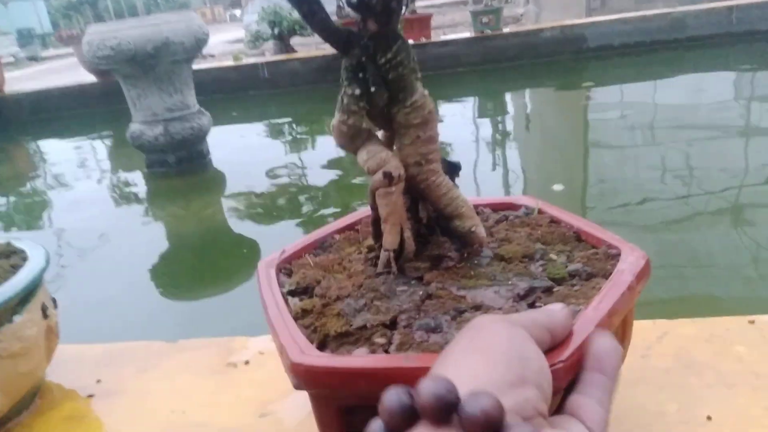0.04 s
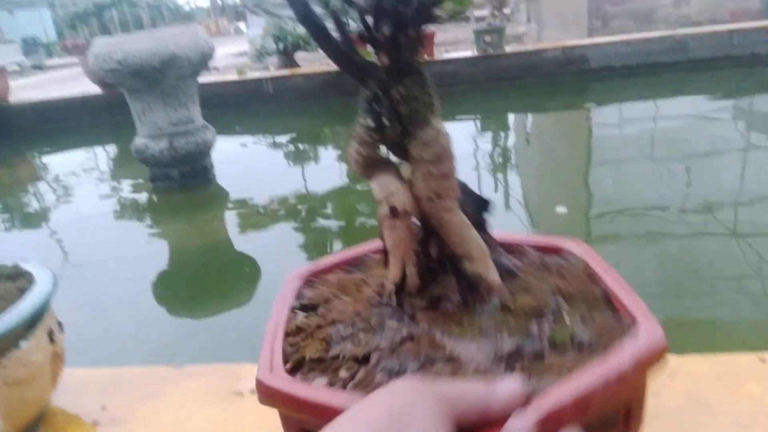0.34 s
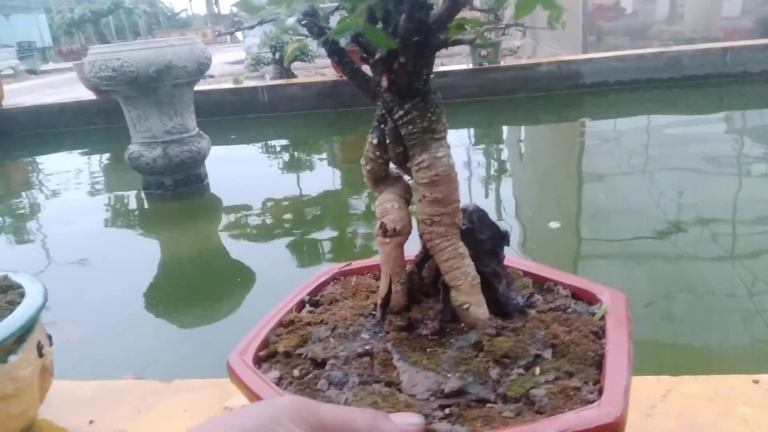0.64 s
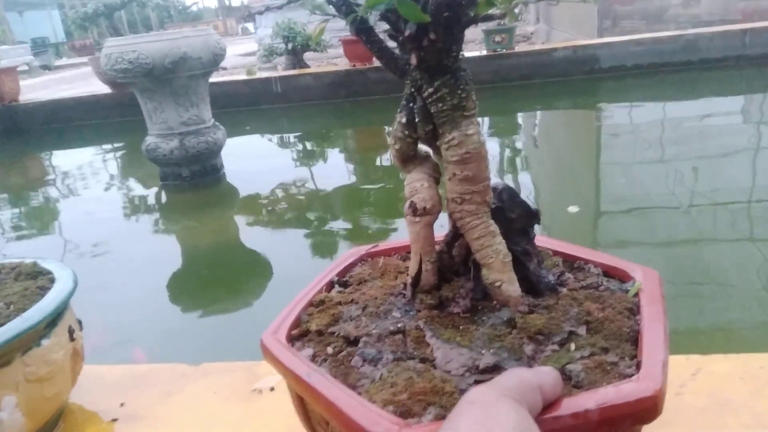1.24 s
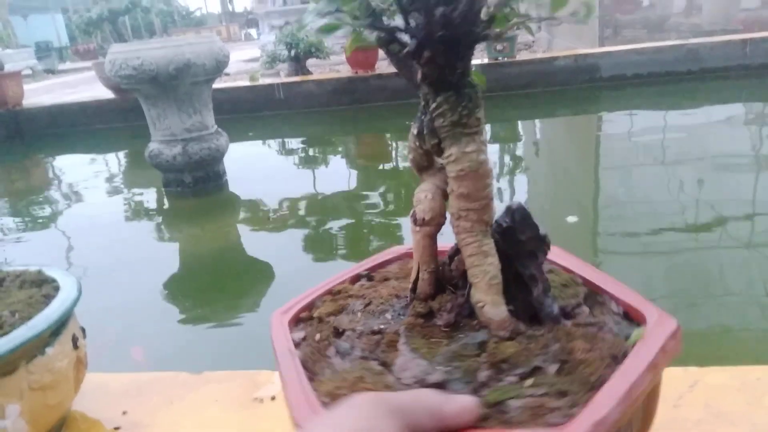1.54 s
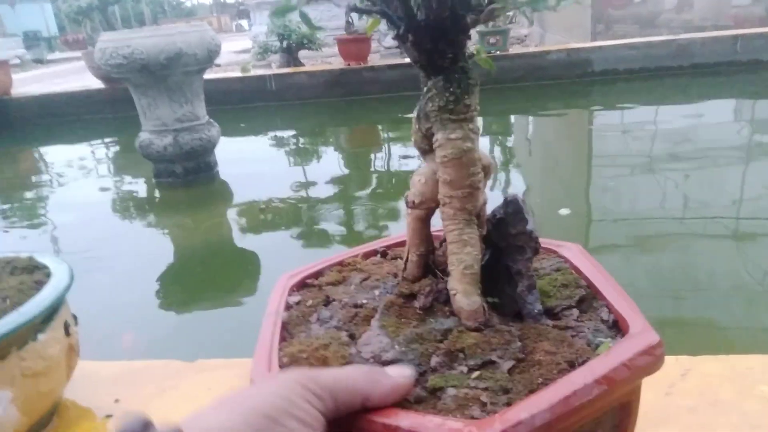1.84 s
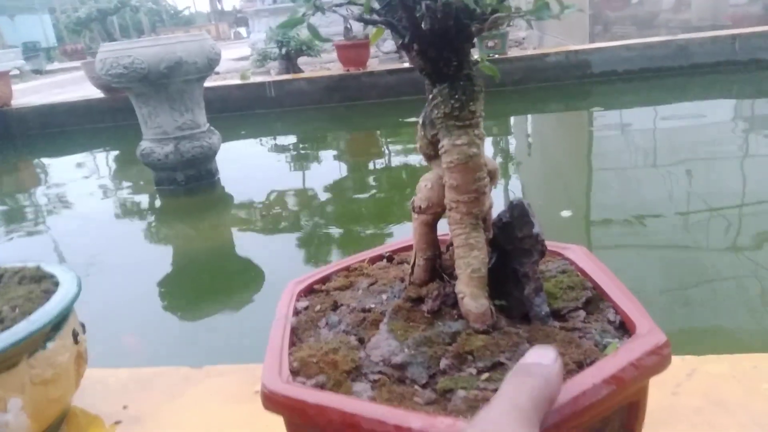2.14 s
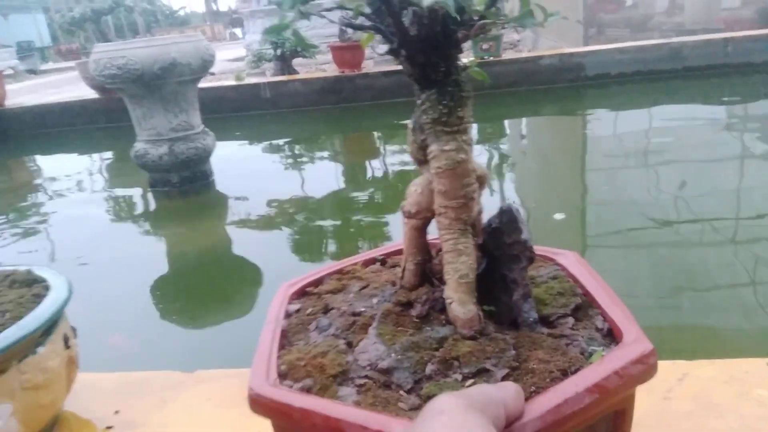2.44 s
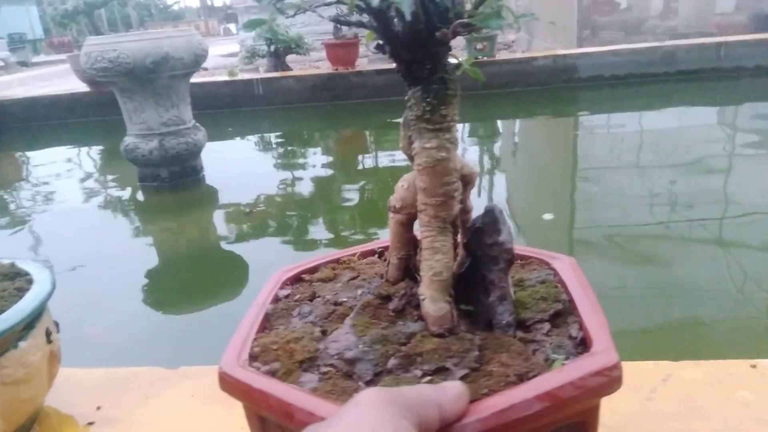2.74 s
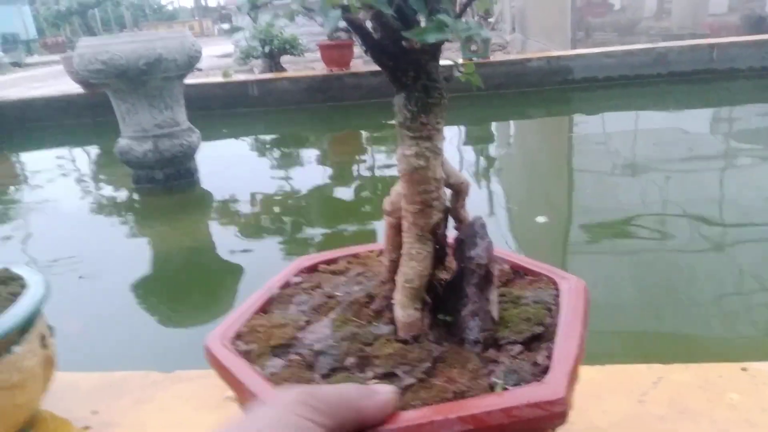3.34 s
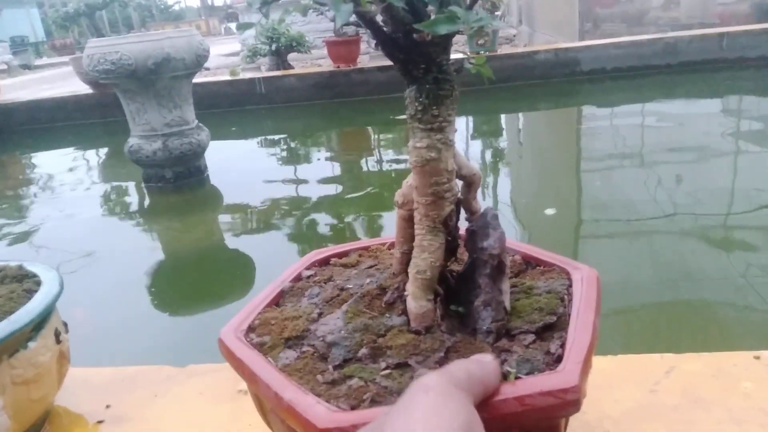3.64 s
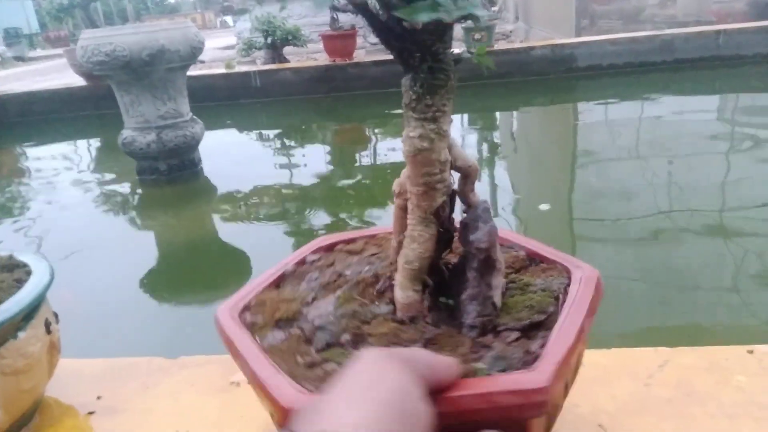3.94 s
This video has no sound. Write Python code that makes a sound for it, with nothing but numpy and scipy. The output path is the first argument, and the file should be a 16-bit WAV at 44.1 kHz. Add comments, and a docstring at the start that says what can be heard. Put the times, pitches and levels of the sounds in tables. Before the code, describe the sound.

A ceramic pot scrapes on gritty concrete from 0.2 to 0.8 seconds, juddering, with dull knocks, tiny squeaks and a slight ring. A second scrape runs from about 1.5 to 1.9 seconds. Two shorter pushes, joined by a light slide, follow between 2.6 and 3.3 seconds. Grit cracks near 3.85 seconds before a last brief slide. A steady low outdoor rumble lies underneath.

```python
"""A glazed ceramic planter full of soil is turned by hand on a gritty concrete ledge by a pond.
Over a steady outdoor rumble, the first push starts at 0.2 s: sand hisses under the foot, coarser grit
rings the wall, and the pot judders, knocks and squeaks as it catches. A second push follows at 1.45 s.
The hand rubs softly as it takes a new grip, then gives two shorter pushes between 2.6 and 3.3 s.
Two faint chirps sound far off, and near 3.85 s grit cracks under the foot before one last light slide."""
import sys
import numpy as np
from scipy import signal
from scipy.fft import rfft, irfft, next_fast_len
from scipy.io import wavfile
from scipy.ndimage import map_coordinates

SR = 44100
rng = np.random.default_rng(int(sys.argv[2]) if len(sys.argv) > 2 else 0)


def bounce(signal):
    """Save signal as a 16-bit WAV file at the path given by the first command-line argument."""
    frames = np.transpose(np.atleast_2d(signal))
    limited = np.clip(frames, -1, 1)
    pcm = np.round(limited * 32767).astype(np.int16)
    wavfile.write(sys.argv[1], SR, pcm)


N = 176400  # 4 seconds

# Levels in the tables are starting values; the functions add their own gains.
# how hard the pot scrapes, one list for each push: time_s, hiss_db, grind_db, judder_db
PUSHES = [
    [(0.198, -83, -80, -79), (0.232, -66, -66, -54), (0.314, -60, -54.5, -46.5), (0.434, -60, -54.5, -43.5),
     (0.458, -50, -41.5, -39.5), (0.496, -62.5, -61, -45), (0.588, -57.5, -52, -43.5),
     (0.598, -59, -56, -44.5), (0.704, -63, -56, -48), (0.71, -56.5, -52, -48), (0.774, -67, -66.5, -62.5),
     (0.786, -105, -92, -75)],
    [(1.45, -88, -78, -67), (1.47, -77, -65, -41.5), (1.486, -66.5, -59.5, -47.5),
     (1.646, -59.5, -53, -44.5), (1.66, -54, -46, -37.5), (1.672, -58, -50, -40),
     (1.69, -55.5, -49.5, -39.5), (1.772, -64.5, -60.5, -50), (1.796, -60.5, -54.5, -52),
     (1.818, -62.5, -55, -42), (1.868, -66, -65.5, -66), (1.884, -93, -91, -57)],
    [(2.568, -93, -83, -51), (2.582, -77, -73, -67), (2.612, -67.5, -62, -45.5), (2.628, -66, -61, -61),
     (2.642, -64.5, -58.5, -46.5), (2.664, -62, -59, -48), (2.684, -69, -64, -55), (2.696, -69, -65, -52),
     (2.702, -58, -59, -49), (2.756, -68.5, -64, -58.5), (2.764, -84, -82, -54), (2.775, -74, -79, -59)],
    [(2.968, -83, -95, -55), (2.988, -71, -69, -54), (3.022, -70.5, -70.5, -60), (3.06, -62, -57.5, -48),
     (3.07, -65, -58, -53.5), (3.168, -58.5, -57.5, -45), (3.19, -61.5, -62, -54),
     (3.23, -60.5, -57.5, -43.5), (3.24, -63, -60, -54), (3.264, -61.5, -60, -52), (3.294, -63.5, -74, -65),
     (3.304, -89, -93, -80)],
]
# light slides between and after the pushes: time_s, hiss_db, grind_db, judder_db
SLIDES = [
    [(2.785,-82,-79,-72), (2.808,-62.5,-64.5,-55.5), (2.88,-63.5,-73,-66), (2.95,-63.5,-65,-56),
     (2.962,-85,-101,-80)],
    [(3.933,-92,-89,-57), (3.947,-69,-65,-57.5), (3.984,-68.5,-59.5,-52.5), (4.0,-61,-72,-54)],
]
# the pot creeps while the grip changes: start_s, length_s, hiss_db, grind_db
CREEPS = [(1.209, 0.033, -71, -78), (1.324, 0.03, -78.5, -77), (1.995, 0.019, -75.5, -81),
          (2.446, 0.024, -76.5, -72.5), (3.834, 0.057, -67, -67.5)]
# the tone of one sand grain at the two microphones: frequency_hz, left_db, right_db
SAND_TONE = [(497, -2, -16), (1460, -2, -3.5), (2420, -3.5, -3.5), (3030, -5.5, 2), (3940, -12, -1),
             (4620, -17.5, 4.5), (6060, -18.5, -6.5), (6940, -25, -4.5), (8000, -31, -6.5),
             (10700, -36, -7), (12700, -35, -19), (15500, -33, -28)]
# the tone of one coarser grain: frequency_hz, left_db, right_db
GRIT_TONE = [(298, -32, -8.5), (893, -7.5, -18), (1047, -3, -4), (1300, -3, -18), (1640, -5.5, -14),
             (2160, 3, -6), (2690, -13.5, -11.5), (3100, -19, -10), (4200, -24, -27.5), (6200, -33, -24),
             (7500, -41, -31.5), (15500, -41, -47)]
# the notes of the pot's wall: pitch_hz, level_db, ring_s (time to fade by 60 dB), left_minus_right_db
WALL_NOTES = [(1008, -10, 0.11, -5), (1070, -16, 0.054, 0), (1469, -17.5, 0.11, 0), (1813, -6.5, .045, 10),
              (1924, -2.5, 0.067, 8), (2094, -7, 0.089, 11), (2171, 2.5, 0.065, 1.5), (2244, 1, 0.16, 3),
              (2450, -5.5, 0.088, 6.5), (2730, -16.5, 0.15, -8), (3280, -11, 0.14, 3),
              (4050, -12.5, 0.015, -15)]
# how firmly the foot's point of contact drives the wall as the pot turns: time_s, level_db
WALL_DRIVE = [(.24, 6), (.35, 0), (.5, 0), (.62, -5.5), (1.48, 2), (1.7, -2.5), (1.85, -5), (2.65, 0),
              (2.85, -2), (3.15, -6.5), (3.96, -1)]
# the tone of one bump of the heavy pot on the ledge: frequency_hz, level_db
BUMP_TONE = [(30, -29), (90, 3.5), (160, 6.5), (230, 2.5), (320, 1.5), (380, -1), (500, -0.5), (720, -4.5),
             (900, -21), (1400, -29), (4000, -95)]
# the foot drops on the ledge: start_s, level_db, cutoff_hz (treble above this is softened)
KNOCKS = [(.454, -20.5, 1650), (0.575, -30, 654), (.586, -30.5, 443), (1.401, -47, 800), (1.47, -39, 600),
          (1.657, -30, 1310), (1.731, -28.5, 700), (2.192, -33, 416), (2.640, -33, 690),
          (2.647, -37.5, 550), (2.656, -33.5, 595), (3.228, -36.5, 700)]
# the tone of a knock before it is softened: frequency_hz, level_db
KNOCK_TONE = [(40, -11.5), (130, 5), (280, 5), (480, -2.5), (750, -9), (1000, -23), (2000, -56),
              (6000, -55)]
# the foot sticks and squeaks: start_s, length_s, pitch_hz, level_db
SQUEAKS = [(0.504, 0.0086, 2076, -44.5), (.591, 0.0095, 1436, -45.5), (.592, 0.0072, 1880, -44),
           (0.637, 0.0043, 1890, -36), (0.644, 0.0147, 1930, -47), (0.667, 0.01, 1355, -51.5),
           (0.7094, 0.0059, 2090, -43.5), (0.726, 0.0099, 1484, -51.5), (1.842, 0.013, 1850, -52)]
# large grains crack under the foot, singly or in quick runs: start_s, level_db
CRACKS = [(.4555, -40), (.462, -40), (.468, -38.5), (1.659, -47), (1.694, -44), (2.703, -48), (3.138, -50),
          (3.8419, -59), (3.847, -52), (3.8542, -49.5), (3.857, -42), (3.861, -38), (3.866, -41.5)]
# the tone of a crack: frequency_hz, left_db, right_db
CRACK_TONE = [(597, -8, -27), (1450, 10, -10), (2620, 7, 5), (4270, -13, -1), (6440, -26, -0.5),
              (8440, -35, -6), (9800, -25, 2), (12700, -25, -9), (15500, -28, -23)]
# the ceramic notes that a crack sets ringing: pitch_hz, level_db, ring_s
CRACK_NOTES = [(527, -3.5, 0.03), (700, -9.5, 0.042), (1380, -9.5, 0.024), (2137, -2.5, 0.024),
               (2500, -5.5, 0.014), (3500, -17.5, 0.023), (4125, -7.5, 0.03), (4350, -13, 0.026),
               (4470, -15.5, 0.022)]
# thin, high ringing of the wall: start_s, length_s, pitch_hz, level_db
WALL_SINGING = [(.27, 0.18, 5380, -75), (0.233, .2, 5930, -72), (0.264, .16, 6700, -75),
                (0.245, .15, 7400, -78), (.53, .11, 6210, -73), (3.07, .2, 2970, -71)]
# the hand takes a new grip: start_s, length_s, pitch_hz, width_hz, level_db
HAND_RUB = (2.41, .2, 570, 280, -65)
# the tone of the outdoor rumble: frequency_hz, level_db
RUMBLE_TONE = [(11, -31.5), (18, -4), (48, -1.5), (95, -8.5), (130, -7.5), (264, -22.5), (351, -25),
               (415, -31), (536, -31), (731, -38), (1320, -52), (4860, -70), (15500, -81)]
# how alike the rumble is on left and right: frequency_hz, likeness (0 unrelated, 1 the same)
RUMBLE_LIKENESS = [(30, 0.82), (170, 0.98), (300, 0.72), (520, 0.48), (1000, 0), (8000, 0)]
# the tone of the thin background hiss: frequency_hz, level_db
HIGH_HISS_TONE = [(2500, -16), (4000, -8.5), (4500, 6), (5050, 1.5), (5450, -15), (6500, -6.5),
                  (7200, -1.5), (8300, -0.5), (8900, -12), (10500, -5.5), (13000, -17)]
# faint rising chirps far off, perhaps a bird: start_s, length_s, level_db
CHIRPS = [(3.358, .07, -83), (3.412, 0.059, -83)]

SAND_PER_S, GRIT_PER_S, BUMPS_PER_S, SNAPS_PER_S = 6500, 2000, 420, 170  # tiny impacts each second
SAND_DB, GRIT_DB, RING_DB, JUDDER_DB = 2.5, 1.5, -2.5, 2.5
SAND_SNAP_DB, GRIT_SNAP_DB = -11.5, -8  # rarer, larger grains, compared with the small ones
SEATED_DB = -71.5  # with less grinding than this, the pot sits firm and its ring is choked
WANDER_DB, WANDER_PER_S = -1, 8  # each wall note swells and fades as the point of contact moves
LEFT_DELAY_S = 0.00015  # the wall's ring reaches the left microphone later
CRACK_FADE_S, CRACK_DB, CRACK_RING_DB = 0.022, -6, -5.0
RUMBLE_DB, HIGH_HISS_DB = -44.5, -86.5
TOP_HZ = 15700


def sand(hiss_db, snaps):
    """Fine sand is crushed under the foot in a dense hiss, with larger grains snapping in it."""
    sides = []
    for side in (1, 2):  # the left and right columns
        crush = grains(SAND_PER_S, spread_db=2.0) + gain(SAND_SNAP_DB) * snaps
        sides.append(strike(gain(hiss_db + SAND_DB) * crush, click(SAND_TONE, side)))
    return np.array(sides)


def grit(grind_db, snaps):
    """Coarse grains break under the foot with a rough crunch."""
    sides = []
    for side in (1, 2):
        crush = grains(GRIT_PER_S, spread_db=4.0) + gain(GRIT_SNAP_DB) * snaps
        sides.append(strike(gain(grind_db + GRIT_DB) * crush, click(GRIT_TONE, side)))
    return np.array(sides)


def wall_ring(grind_db):
    """The grit sets the pot's wall ringing, and the soil inside damps each note quickly."""
    force = gain(grind_db)
    drive = force * gain(np.interp(np.arange(N) / SR, *np.transpose(WALL_DRIVE)))
    freedom = force / (force + gain(SEATED_DB))  # near 0 when the pot sits firm
    t = np.arange(SR // 6) / SR
    out = np.zeros((2, N))
    for pitch_hz, level_db, ring_s, left_minus_right_db in WALL_NOTES:
        ring = np.sin(2 * np.pi * pitch_hz * t) * gain(-60 * t / ring_s)
        wander = gain(WANDER_DB * wobble(WANDER_PER_S))
        taps = drive * wander * grains(GRIT_PER_S, spread_db=14.0)
        note = strike(taps, ring / np.linalg.norm(ring))
        left, right = pan(gain(RING_DB + level_db) * freedom * note, left_minus_right_db)
        out += [np.roll(left, round(LEFT_DELAY_S * SR)), right]
    return out


def judder(judder_db):
    """The heavy pot bumps over the rough concrete."""
    force = gain(judder_db + JUDDER_DB)
    bump = click(BUMP_TONE)
    middle, width = (strike(force * grains(BUMPS_PER_S, spread_db=1.0), bump) for _ in range(2))
    return pan(middle, db=-1.5) + gain(-17.0) * np.array([width, -width])


def scrape_levels():
    """The hand's moves set three levels in dB: hiss, grinding and judder. The loudest move wins."""
    t = np.arange(N) / SR
    silent_db = -140.0
    creep_shape = [(0, -17), (.2, -1.5), (.85, -1), (1.1, -16)]  # share_of_length, level_db
    moves = list(PUSHES) + list(SLIDES)
    for start_s, length_s, hiss_db, grind_db in CREEPS:
        moves.append([(start_s + length_s * share, hiss_db + db, grind_db + db, silent_db)
                      for share, db in creep_shape])
    levels = np.full((3, N), silent_db)
    for move in moves:
        times, *columns = np.transpose(move)
        curves = [np.interp(t, times, column, silent_db, silent_db) for column in columns]
        levels = np.maximum(levels, curves)
    return levels


def knocks():
    """The pot rocks and lands; the softer the landing, the duller the knock."""
    out = np.zeros(N)
    for start_s, level_db, cutoff_hz in KNOCKS:
        soften = signal.butter(3, cutoff_hz, fs=SR, output="sos")
        knock = signal.sosfilt(soften, click(KNOCK_TONE))
        add(out, start_s, -gain(level_db) * knock / abs(knock).max())
    return pan(out, db=2.5)


def squeaks():
    """The foot sticks and slips very fast, making tiny squeaks that rise in pitch."""
    out = np.zeros(N)
    for start_s, length_s, pitch_hz, level_db in SQUEAKS:
        add(out, start_s, gain(level_db) * glide(length_s, pitch_hz, rise=0.19, rough_radians=0.94))
    return pan(out, db=7.0)


def cracks():
    """A large grain cracks in a bright burst of noise, with a brief ceramic ring."""
    bursts, rings = np.zeros((2, N))
    t = np.arange(SR // 12) / SR
    for start_s, level_db in CRACKS:
        fade = gain(level_db + CRACK_DB - 60 * t / CRACK_FADE_S)
        add(bursts, start_s, fade * rng.standard_normal(len(t)))
        for pitch_hz, note_db, ring_s in CRACK_NOTES:
            fade = gain(level_db + note_db + CRACK_RING_DB - 60 * t / ring_s)
            add(rings, start_s, fade * np.sin(2 * np.pi * (pitch_hz * t + rng.random())))
    bright = np.array([strike(bursts, click(CRACK_TONE, side)) for side in (1, 2)])
    return pan(bright, db=5) + rings


def wall_singing():
    """The wall's high notes sing while the foot drags at the right spot."""
    out = np.zeros(N)
    for start_s, length_s, pitch_hz, level_db in WALL_SINGING:
        add(out, start_s, gain(level_db) * narrow_noise(length_s, pitch_hz, width_hz=230))
    return np.array([out, out])


def hand_rub():
    """Skin slides over the glaze with a dull, soft rustle."""
    out = np.zeros(N)
    start_s, length_s, pitch_hz, width_hz, level_db = HAND_RUB
    add(out, start_s, gain(level_db) * narrow_noise(length_s, pitch_hz, width_hz))
    return np.array([out, out])


def outdoors():
    """A distant rumble, alike on both sides in the bass, with thin hiss and faint chirps on the right."""
    def middle_and_width(hz):
        likeness = np.clip(look_up(RUMBLE_LIKENESS, hz), 0, 1)
        width_gain = np.tan(np.arccos(likeness) / 2)  # less alike sounds wider
        return gain(look_up(RUMBLE_TONE, hz)) * [np.ones_like(hz), width_gain]

    middle, width = filtered(rng.standard_normal((2, N)), middle_and_width)
    rumble = normalize(np.array([middle + width, middle - width]))
    rumble *= gain(RUMBLE_DB + 0.41 * wobble(5.58))
    high = normalize(filtered(rng.standard_normal(N), lambda hz: gain(look_up(HIGH_HISS_TONE, hz))))
    high *= gain(HIGH_HISS_DB + 0.39 * wobble(3.8))
    for start_s, length_s, level_db in CHIRPS:
        add(high, start_s, gain(level_db) * glide(length_s, pitch_hz=4860, rise=0.09, rough_radians=0.9))
    return pan(rumble, db=-0.36) + high * gain([[-16], [0]])


def grains(per_s, spread_db):
    """Tiny impacts at random moments and of random size."""
    hits = rng.random(N) < per_s / SR
    signs = rng.choice([-1, 1], N)
    sizes = gain(spread_db * np.clip(rng.standard_normal(N), -2, 2))
    return normalize(hits * signs * sizes)


def click(tone, column=1, size=4096):
    """A click with the tone that a table gives, and a total energy of 1."""
    log_tone = np.log(gain(look_up(tone, np.fft.rfftfreq(size, 1 / SR), column)))
    # folding the second half onto the first packs the sound at the start of the click
    folded = irfft(log_tone)
    folded[1:size // 2] *= 2
    folded[size // 2 + 1:] = 0
    wave = irfft(np.exp(rfft(folded)))
    return wave / np.linalg.norm(wave)


def strike(force, sound):
    """Every tap in the force sets off one copy of the sound."""
    return signal.fftconvolve(force, sound)[:N]


def glide(length_s, pitch_hz, rise, rough_radians):
    """A short, rough tone that swells and fades while it rises by a share of its pitch."""
    progress = np.linspace(0, 1, round(length_s * SR))
    rising_hz = pitch_hz * (1 + rise * (progress - .5))
    phase = 2 * np.pi * np.cumsum(rising_hz) / SR + rough_radians * wobble(880)[:len(progress)]
    return np.sin(np.pi * progress) * np.sin(phase)


def narrow_noise(length_s, pitch_hz, width_hz):
    """Rubbing noise that wavers around one pitch, swells and fades."""
    progress = np.linspace(0, 1, round(length_s * SR))
    waver = (wobble(width_hz) + 1j * wobble(width_hz))[:len(progress)]
    noise = waver * np.exp(2j * np.pi * pitch_hz * length_s * progress)
    return np.sqrt(abs(np.sin(np.pi * progress))) * normalize(noise.real)


def wobble(per_s):
    """A smooth curve through per_s random points each second."""
    return map_coordinates(rng.standard_normal(int(N * per_s / SR) + 4), [np.arange(N) * per_s / SR])


def look_up(table, hz, column=1):
    """Read a table between its rows, with frequency spaced like musical pitch."""
    columns = np.transpose(table)
    return np.interp(np.log(hz + 1), np.log(columns[0] + 1), columns[column])


def filtered(x, response):
    """Turn each frequency in x up or down by response(hz)."""
    size = next_fast_len(N + SR // 2)
    return irfft(rfft(x, size) * response(np.fft.rfftfreq(size, 1 / SR)), size)[..., :N]


def gain(db):
    """Turn decibels into a number to multiply by."""
    return 10 ** (np.asarray(db) / 20)


def normalize(x):
    """Scale x to an average power of 1."""
    return x / np.sqrt(np.mean(x ** 2) + 1e-20)


def add(out, start_s, x):
    """Mix x into out, beginning at start_s."""
    part = out[round(start_s * SR):][:len(x)]
    part += x[:len(part)]


def pan(x, db):
    """Lean x to the left by db, or to the right if db is negative."""
    return x * gain([[db / 2], [-db / 2]])


def scene():
    """The foot catches and slips unevenly, which shakes all the scraping layers together."""
    hiss_db, grind_db, judder_db = scrape_levels()
    slip = wobble(per_s=115)
    hiss_db += 1.9 * slip
    grind_db += 1.26 * slip
    judder_db += 0.73 * slip
    snaps = grains(SNAPS_PER_S, spread_db=2.5)
    scrape = sand(hiss_db, snaps) + grit(grind_db, snaps) + wall_ring(grind_db) + judder(judder_db)
    return scrape + knocks() + squeaks() + wall_singing() + hand_rub() + cracks() + outdoors()


def record(dry):
    """Cut away the highest treble, above TOP_HZ."""
    return filtered(dry, lambda hz: hz < TOP_HZ)


dry = scene()
out = record(dry)
bounce(out)
```